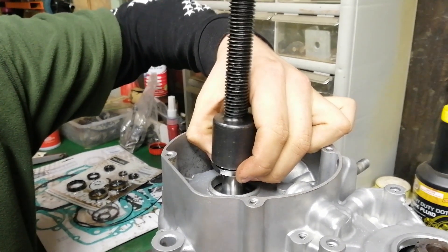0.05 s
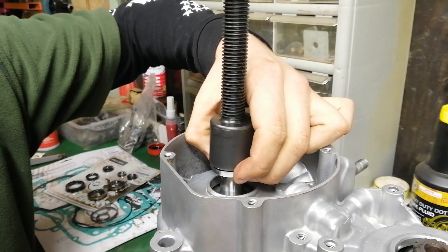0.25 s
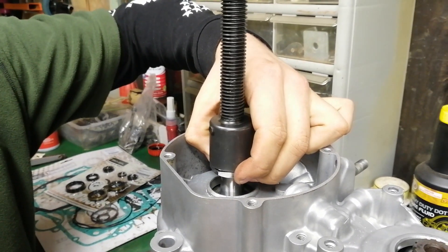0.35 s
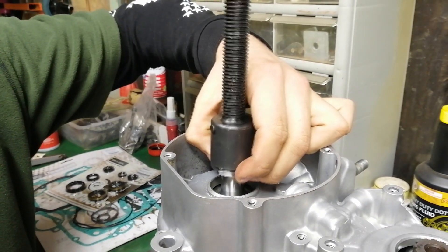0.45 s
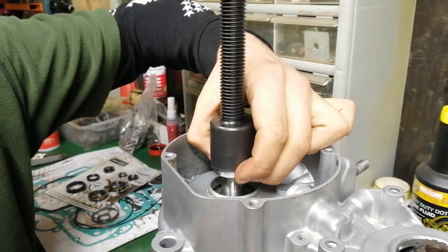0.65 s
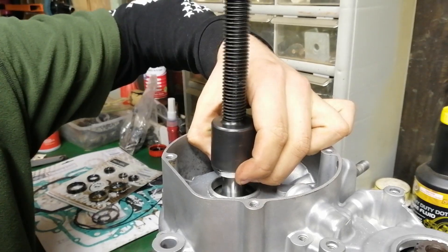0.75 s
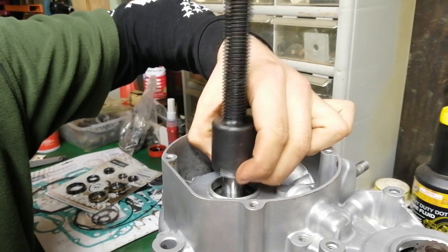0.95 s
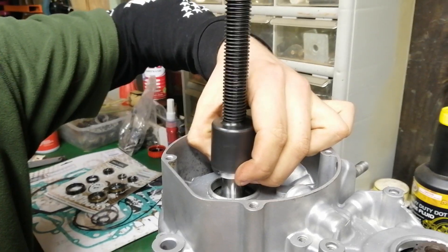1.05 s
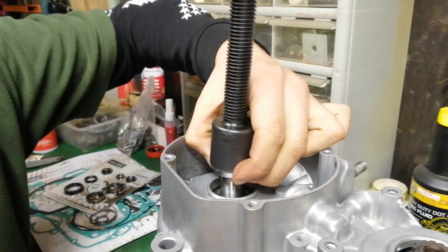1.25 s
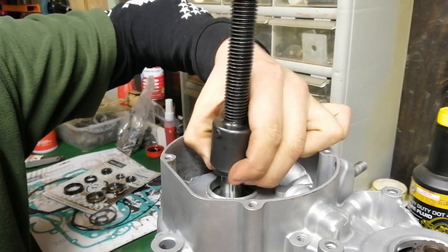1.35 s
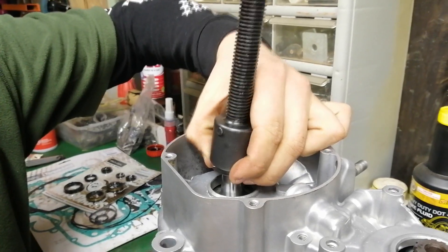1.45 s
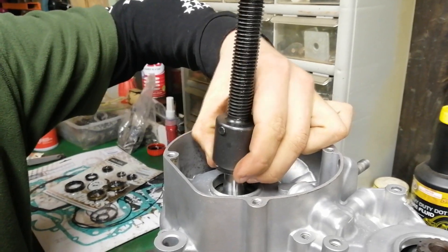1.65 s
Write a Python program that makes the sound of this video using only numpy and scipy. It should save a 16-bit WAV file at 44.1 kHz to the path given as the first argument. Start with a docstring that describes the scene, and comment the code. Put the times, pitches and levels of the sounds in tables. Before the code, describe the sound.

Steel thread scrapes and groans as a loose rod turns in short strokes, knocking a metal housing

```python
"""A faint knock in a quiet workshop, then a steel threaded rod is spun by hand into a nut on a cast housing.
Fingers rasp on the thread in three spells, as they take a new grip; the loose rod knocks and rocks to the end.
Over four turns random slips scrape; short uneven groans are the thread juddering (swept sines).
Knocks and scrapes ring one body: decaying modes, dense noise tail and direct click, in six bands.
The housing gives soft sagging thuds and a last dull shuffle on the bench, over steady room tone."""
import sys
import numpy as np
from scipy import signal
from scipy.io import wavfile

SR = 44100
rng = np.random.default_rng(int(sys.argv[2]) if len(sys.argv) > 2 else 0)


def wrap_up_sound(samples):
    """Save the sound to the file named by the first command line argument, as 16-bit audio."""
    columns = np.atleast_2d(samples).T
    # keep every value between -1 and 1, then stretch to whole-number steps
    tamed = np.clip(columns, -1, 1)
    steps = np.round(tamed * 32767).astype(np.int16)
    wavfile.write(sys.argv[1], SR, steps)


N = 74970
TIME = np.arange(N) / SR
RING_TIME = TIME[:SR // 2]
CUTOFF_HZ = 14200
SLIPS_PER_S = 1700

# weak short modes of rod and housing: hz, level_db (relative)
CROWD_SPECTRUM = [(40, -28), (150, -6), (290, 8), (520, -3.5), (680, -6.5), (900, 5), (1250, -4),
                  (1600, -12.5), (2700, -10.5), (3400, -22.5), (4750, -20.5), (5400, -9), (5850, -11),
                  (6300, -31), (11500, -27), (14500, -43.5)]


def amp(db):
    """Decibels to gain."""
    return 10 ** (np.asarray(db) / 20)


def read(points, hz):
    """A table's value at hz, on a log-frequency axis."""
    f, value = np.transpose(points)
    return np.interp(np.log(hz + 1), np.log(f), value)


def level(times, dbs):
    """Gain along a level curve, silent outside it."""
    inside = (TIME >= times[0]) * (TIME <= times[-1])
    return amp(np.interp(TIME, times, dbs)) * inside


def unit(x):
    """Scales a stereo response to a mean energy of 1 per channel."""
    return x / np.sqrt(np.sum(x ** 2) / 2 + 1e-20)


def pan(db):
    """Left and right gains of constant power for a left-right difference."""
    gains = np.array([amp(db / 2), amp(-db / 2)])
    return gains / np.sqrt(np.mean(gains ** 2, 0))


def convolve(x, response):
    """Plays x through a response."""
    return signal.fftconvolve(np.atleast_2d(x), np.atleast_2d(response), axes=1)[:, :N]


def colour(x, points, size=4096):
    """Causal minimum-phase filter with the given spectrum."""
    hz = abs(np.fft.fftfreq(size, 1 / SR))
    log_gain = np.log(amp(read(points, hz)))
    min_phase = np.exp(np.conj(signal.hilbert(log_gain)))
    taps = np.fft.ifft(min_phase).real[:size // 2]
    return convolve(x, taps)[:, :x.shape[-1]]


def stereo_noise(count, t60=None, size=256):
    """White noise as two microphones share it, dying away by band if t60 is given."""
    # hz, left_right_coherence
    likeness = [(100, 0.81), (400, 0.98), (900, 0.16), (1500, 0.043), (2500, 0.11), (6000, 0.0099)]
    # hz, left_right_db
    balance = [(200, 1.5), (1400, 2.5), (2300, 2), (4200, 7), (8000, 4), (10000, 2), (11500, -9.5),
               (14000, 1)]
    hz, t, (a, b) = signal.stft(rng.standard_normal((2, count)), SR, nperseg=size)
    same = np.clip(read(likeness, hz), -1, 1)[:, None]
    pair = np.array([a, same * a + np.sqrt(1 - same ** 2) * b])
    pair = pair * pan(read(balance, hz))[:, :, None]
    if t60:
        pair = pair * amp(-60 * t / read(t60, hz)[:, None])
    return signal.istft(pair, SR, nperseg=size)[1][:, :count]


def slips(per_s):
    """Friction force: tiny slips at random moments, a few of them large; rms 1."""
    spread_db = 3.6
    size = amp(spread_db * np.minimum(rng.exponential(1, N), 3.5)) * rng.choice([-1, 1], N)
    force = size * (rng.random(N) < per_s / SR)
    return force / (force.std() + 1e-9)


def wobble():
    """Quick, smooth random unevenness of rms 1."""
    smooth_s = 0.0046
    lowpass = signal.butter(2, .5 / smooth_s, fs=SR, output="sos")
    x = signal.sosfilt(lowpass, rng.standard_normal(N))
    return x / x.std()


def click(spectrum):
    """The direct sound of a contact, before anything rings."""
    return unit(colour(np.ones((2, 1)) * (RING_TIME == 0), spectrum))


def crowd(spectrum):
    """Countless weak modes and near reflections: a crack, then a short tail."""
    # tail decay: hz, t60_s
    crowd_t60 = [(100, 0.32), (1000, 0.076), (3000, 0.087), (12000, 0.098)]
    crack_db, crack_s = 0, 0.0072
    crack = 1 + amp(crack_db) * np.exp(-RING_TIME / crack_s)
    return unit(colour(stereo_noise(len(RING_TIME), crowd_t60) * crack, spectrum))


def ring(damping=1):
    """Main modes, decay set by the hand's damping; higher ones differ more in phase left to right."""
    # rod and housing modes: hz, level_db (relative), t60_s (at damping 1), left_right_db
    modes = [(232, 0.5, 0.17, -4.5), (404, -15, 0.22, 6), (779.3, -7, 0.09, 8.5), (888, -4.5, 0.063, -4.5),
             (971, 2.5, 0.12, 1.5), (1078.4, -10.5, 0.14, 12), (1095, -13, 0.13, 12),
             (1449, -0.5, 0.065, -1.5), (1528, -4.5, 0.032, 2), (1733, -11.5, 0.19, 10),
             (1810, -24.5, 0.22, -2), (2230, -26, 0.1, 9), (2367, -4.5, 0.048, 9), (2770, -15.5, 0.13, 24),
             (2938, -19, 0.13, -8), (3970, -26.5, 0.12, 1), (5500, -45, 0.023, 7), (10000, -18.5, 0.09, -2)]
    rise_cycles, phase_spread_hz = 0.53, 1280
    t, out = RING_TIME, 0
    for hz, db, t60_s, side_db in modes:
        lead = -min(hz / phase_spread_hz, np.pi / 2) * np.array([[.5], [-.5]])
        envelope = amp(db - 60 * t * damping / t60_s) * (1 - np.exp(-t * hz / rise_cycles))
        out = out + pan(side_db)[:, None] * envelope * np.sin(2 * np.pi * hz * t + lead)
    return unit(out)


def registers(response):
    """Bass, ring, clang, clink, hiss and sizzle bands of a response, each of energy 1."""
    # band borders, low to high: edge_hz
    edges = [528, 1320, 2080, 3720, 7500]

    def band(edge_hz, kind, order):
        return unit(signal.sosfilt(signal.butter(order, edge_hz, kind, fs=SR, output="sos"), response))
    bass = band(edges[0], "low", order=3)
    ring_band = band(edges[:2], "band", order=2)
    middle = [band(pair, "band", order=3) for pair in zip(edges[1:], edges[2:])]
    sizzle = band(edges[-1], "high", order=4)
    return [bass, ring_band, *middle, sizzle]


def workshop():
    """Faint steady room tone: coloured stereo noise."""
    # hz, level_db (relative)
    room_tone = [(20, 9), (45, -8), (70, 7.5), (140, 4.5), (260, 0.5), (550, -13), (1000, -14), (2500, -19),
                 (4000, -26), (5600, -27), (8000, -33), (12500, -39), (14500, -78)]
    room_db = -64
    air = colour(stereo_noise(N), room_tone)
    return amp(room_db) * air / air.std()


def bench():
    """The housing settles with low thuds that sag in pitch, and a last dull shuffle of random slips."""
    # shuffle of the housing on the bench: time_s, level_db
    shuffle = [(1.519, -41.5), (1.551, -55), (1.596, -57), (1.649, -86)]
    # hz, level_db (relative)
    shuffle_colour = [(30, -12), (80, 4), (200, 1.5), (600, -6), (1500, -14), (5000, -44.5)]
    # thuds of the housing on the bench: start_s, level_db
    thuds = [(0.259, -53), (0.967, -53.5), (1.125, -49.5), (1.531, -42.5)]
    thud_hz, sag_hz_per_s, t60_s, rise_s = 73.3, 200, 0.25, 0.0032
    out = convolve(slips(SLIPS_PER_S) * level(*np.transpose(shuffle)), crowd(shuffle_colour))
    for start_s, db in thuds:
        t = np.maximum(TIME - start_s, 0)
        envelope = amp(db - 60 * t / t60_s) * (1 - np.exp(-t / rise_s)) * (t < t60_s)
        cycles = (thud_hz - sag_hz_per_s * t / 2) * t
        out = out + envelope * np.sin(2 * np.pi * cycles)
    return out


def fingers():
    """Short, thin rasps as the hand shifts its grip: random slips, each rasp peaking at its own pitch."""
    # fingers sliding over the thread: start_s, length_s, level_db, pitch_hz
    grips = [(0.14, 0.031, -59.5, 1060), (0.166, 0.0072, -54, 1280), (0.207, 0.047, -55, 1090),
             (0.555, 0.011, -52.5, 2700), (0.5708, 0.0036, -47.5, 1320), (0.579, 0.014, -48.5, 1430),
             (0.6075, 0.0059, -45, 1060), (0.617, 0.014, -50.5, 1030), (1.682, 0.057, -59.5, 1680)]
    # hz, level_db (relative)
    grip_colour = [(100, -12), (350, -3), (600, -13), (1050, 10), (1700, 0.5), (2300, 1), (2850, 1.5),
                   (3400, -17.5), (4600, -27), (5500, -4.5), (6500, -34), (12000, -26), (14500, -56)]
    attack_s, release_s, ridges_per_s = 0.00067, 0.0044, 2100
    peak_db, peak_octaves = 8.5, 0.22
    out, hz = 0, np.geomspace(100, CUTOFF_HZ, 100)
    for start_s, length_s, db, pitch_hz in grips:
        attack = np.clip((TIME - start_s) / attack_s, 0, 1)
        release = np.exp(-np.maximum(TIME - start_s - length_s, 0) / release_s)
        pressure = amp(db) * attack * release
        peak = peak_db * np.exp(-(np.log2(hz / pitch_hz) / peak_octaves) ** 2)
        spectrum = np.transpose([hz, read(grip_colour, hz) + peak])
        response = unit(crowd(spectrum) + click(spectrum))
        out = out + convolve(pressure * slips(ridges_per_s), response)
    return out


def judders():
    """The thread sticks and slips for some cycles: low, uneven groans that swell, most rising in pitch."""
    # start_s, length_s, first_hz, last_hz, level_db (sine peak)
    judder_table = [(0.312, 0.057, 230, 222.5, -42.5), (0.699, .11, 232, 237.3, -42),
                    (0.741, 0.031, 335, 399, -47), (0.78, 0.027, 311, 430, -52.5),
                    (0.936, 0.026, 232, 261, -40), (1.169, 0.0224, 232, 260, -44.5),
                    (1.213, 0.063, 267.4, 308.5, -45.5), (1.313, 0.063, 386, 434, -57)]
    jitter, flutter = 0.05, 0.22  # rms, as fractions of pitch and level
    out = 0
    for start_s, length_s, first_hz, last_hz, db in judder_table:
        progress = np.clip((TIME - start_s) / length_s, 0, 1)
        hz = (first_hz + (last_hz - first_hz) * progress) * (1 + jitter * wobble())
        swell = amp(db) * np.sqrt(abs(np.sin(np.pi * progress))) * (1 + flutter * wobble())
        out = out + swell * np.sin(2 * np.pi * np.cumsum(hz) / SR)
    return out


def threads():
    """Steel slips on steel while the rod turns, and shakes rod and housing."""
    # scrape per turn, rows of: time_s, bass_db, middle_db, treble_db
    turns = [
        [(.18, -103, -72, -68), (.19, -59, -58, -77.5), (.245, -74, -48.5, -64), (.275, -44.5, -48, -54.5),
         (.315, -62, -51.5, -66.5), (.335, -44, -50.5, -59), (.36, -52.5, -52, -65.5),
         (.385, -65.5, -64, -75.5), (.43, -61, -76, -82)],
        [(.66, -57, -42.5, -59.5), (.705, -47.5, -52.5, -65), (.755, -51.5, -52.5, -68),
         (.785, -49.5, -50.5, -59), (.815, -51.5, -50, -68.5), (.85, -62, -59, -78), (.905, -59, -65, -87)],
        [(.905, -53, -65, -73), (.93, -53.5, -57, -83), (.955, -49, -48, -73), (.975, -56, -60, -87),
         (1.04, -71.5, -66.5, -85)],
        [(1.125, -45.5, -45, -69.5), (1.165, -70, -61, -69.5), (1.18, -48.5, -47.5, -66.5),
         (1.23, -50, -46, -66), (1.275, -48, -51, -71.5), (1.295, -61, -54, -66.5),
         (1.325, -52.5, -52.5, -68.5), (1.39, -65, -67, -72.5), (1.45, -70, -68.5, -83)],
    ]
    # hold per turn: damping, clang_db and clink_db (re middle), sizzle_db (re treble)
    holds = [(1.1, -4.5, -7, -4.5), (1.1, -6.5, -9.5, -2.5), (1.1, -26, -14.5, -14), (1.5, -3.5, -12, -1.5)]
    # hz, level_db (relative)
    scrape_colour = [(100, 6), (233, 0.5), (380, 4), (600, 5.5), (1050, 3), (1500, 6.5), (2800, 5.5),
                     (4000, 2), (5700, -5.5), (10000, -10.5), (13000, -2.5)]
    crowd_db, click_db = -0.5, -12.5
    out = 0
    for turn, (damping, clang_db, clink_db, sizzle_db) in zip(turns, holds):
        times, bass, middle, treble = np.transpose(turn)
        force = slips(SLIPS_PER_S)
        body = ring(damping) / damping
        body = body + amp(crowd_db) * crowd(CROWD_SPECTRUM) + amp(click_db) * click(CROWD_SPECTRUM)
        parts = registers(colour(body, scrape_colour))
        curves = [bass, middle, middle + clang_db, middle + clink_db, treble, treble + sizzle_db]
        for dbs, part in zip(curves, parts):
            out = out + convolve(force * level(times, dbs), part)
    return out


def knocks():
    """The rod tips across the play in its thread and strikes the nut: a direct click, then the body rings."""
    # start_s, bass_db, ring_db, clang_db, clink_db, hiss_db, sizzle_db, damping (by the hand)
    knock_table = [(.001, -52, -56.5, -69, -70.5, -76, -81, 1.4),
                   (.032, -58.5, -58, -68, -86, -93, -90, 0.44),
                   (0.2202, -29.5, -26, -33, -43, -51, -64, 1.04),
                   (0.281, -70, -74, -50, -49.5, -74, -76, 0.55),
                   (0.6400, -29, -29.5, -36, -36, -41.5, -45, 1.04),
                   (0.7684, -44.5, -72, -60, -56.5, -70, -57, 0.64),
                   (0.838, -59, -62, -58, -60, -76, -67, 2.8), (0.937, -50, -51, -63, -66, -87, -97, 1.1),
                   (0.9623, -54, -41, -55, -54, -56.5, -74.5, 0.55),
                   (1.004, -67, -63, -65.5, -63, -79, -97, 0.94),
                   (1.0788, -36.5, -36.5, -53, -45, -63.5, -94, 1.34),
                   (1.1138, -44.5, -40.5, -44.5, -49.5, -57, -75, 2.1),
                   (1.305, -68, -54, -54.5, -52.5, -58.5, -72, 1.06),
                   (1.367, -66, -51.5, -61, -62, -64, -73, 1.05),
                   (1.462, -48, -54.5, -71, -75.5, -85, -97, 2.4),
                   (1.476, -49, -43.5, -59, -68, -77.5, -95, 0.45),
                   (1.513, -41, -42, -61, -61, -75, -100, 1.16),
                   (1.525, -68, -44, -48, -55, -68, -103, 0.81)]
    knock_s = 0.008  # table levels are each band's energy as rms over this time
    crowd_db, click_db = -2, -17
    out = np.zeros((2, N))
    for start_s, *dbs, damping in knock_table:
        body = ring(damping)
        body = body + amp(crowd_db) * crowd(CROWD_SPECTRUM) + amp(click_db) * click(CROWD_SPECTRUM)
        mix = sum(amp(db) * part for db, part in zip(dbs, registers(body)))
        hit = np.sqrt(knock_s * SR) * mix
        at = max(round(start_s * SR), 0)
        out[:, at:at + hit.shape[1]] += hit[:, :N - at]
    return out


def scene():
    """All sources at the microphones."""
    return workshop() + bench() + fingers() + judders() + threads() + knocks()


def record(dry):
    """The recorder's band limit: a linear-phase lowpass."""
    taps = signal.firwin(255, CUTOFF_HZ, window=("kaiser", 9), fs=SR)
    return signal.oaconvolve(dry, taps[None], "same")


dry = scene()
out = record(dry)
wrap_up_sound(out)
```